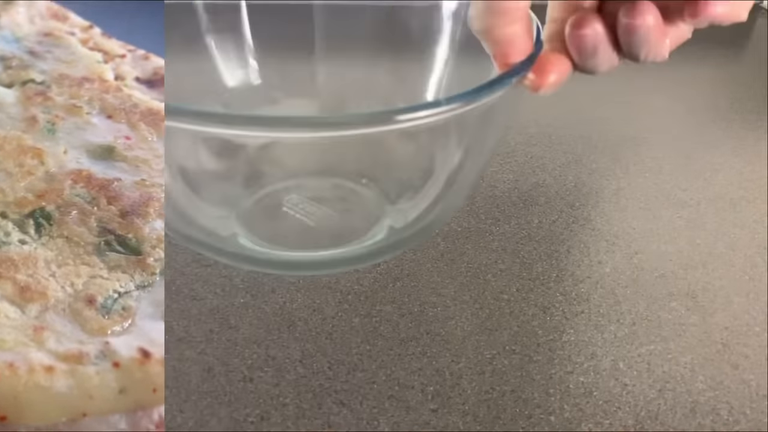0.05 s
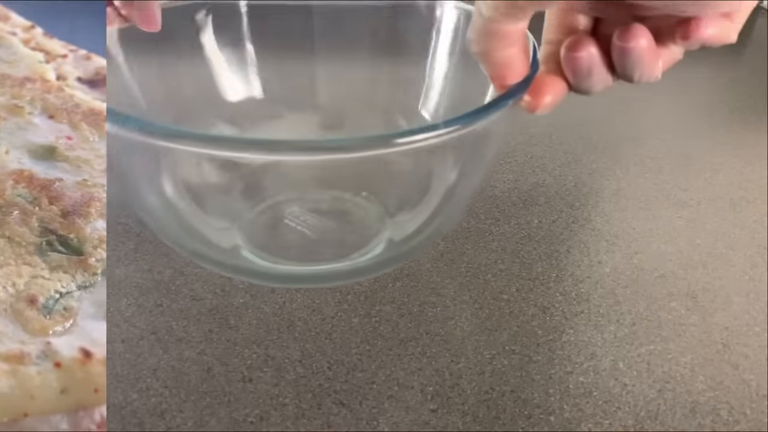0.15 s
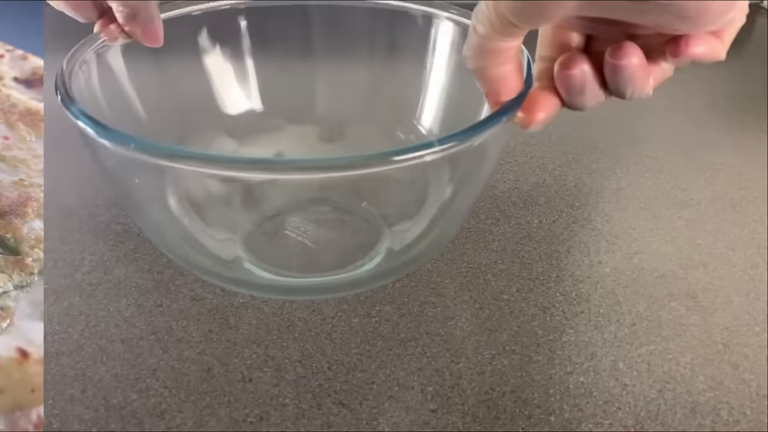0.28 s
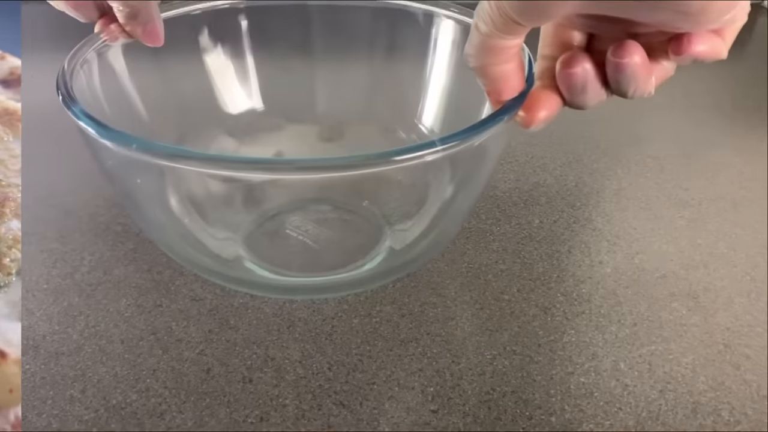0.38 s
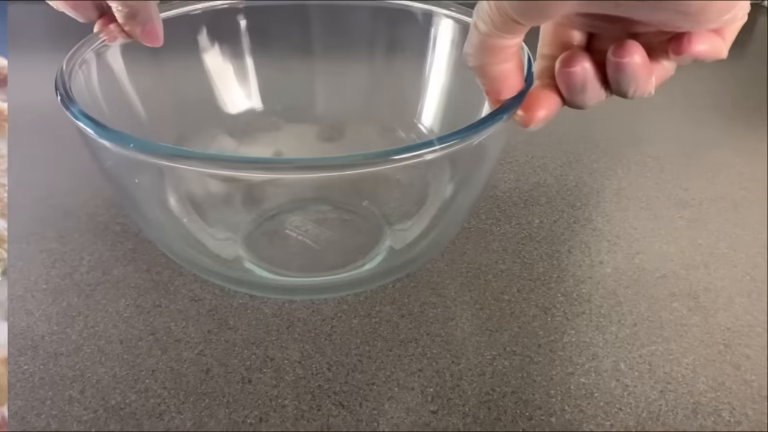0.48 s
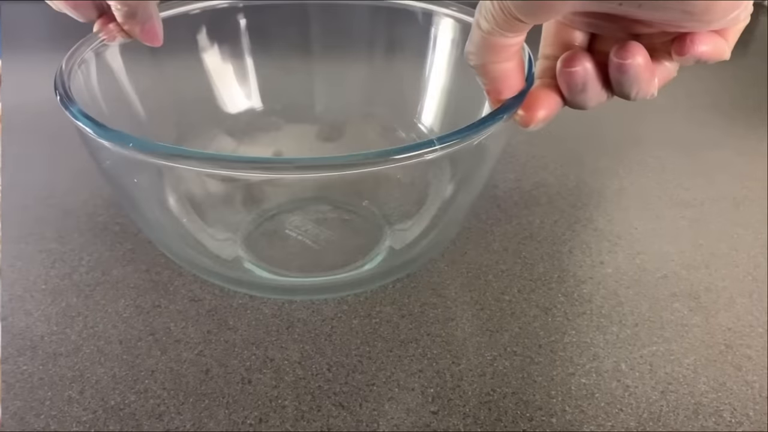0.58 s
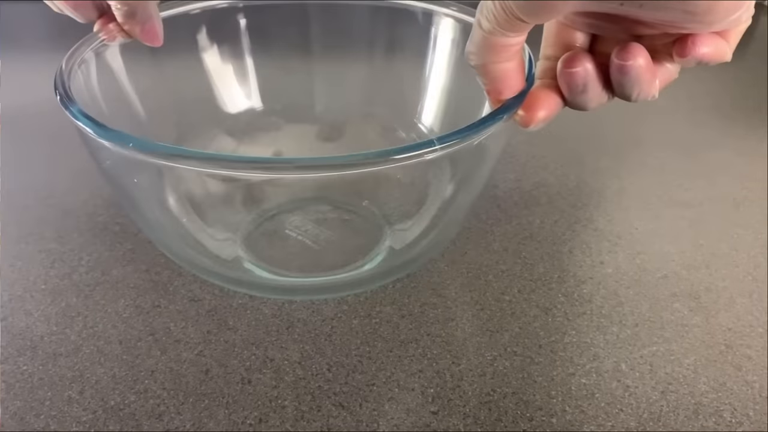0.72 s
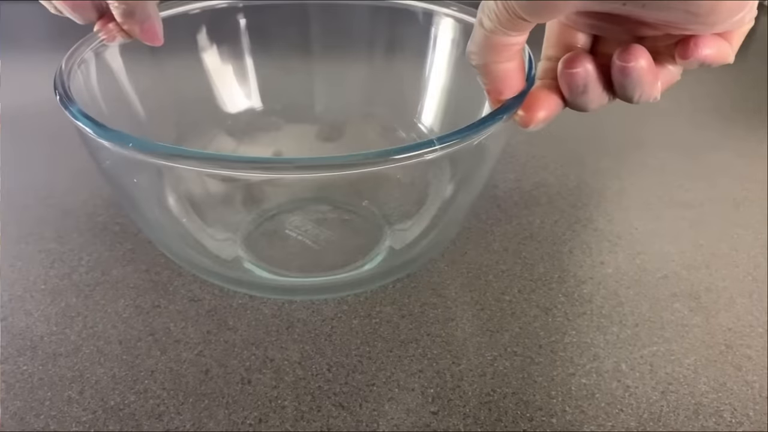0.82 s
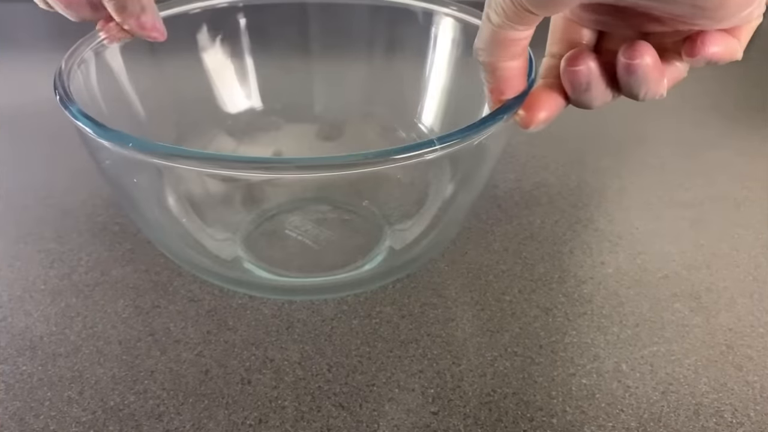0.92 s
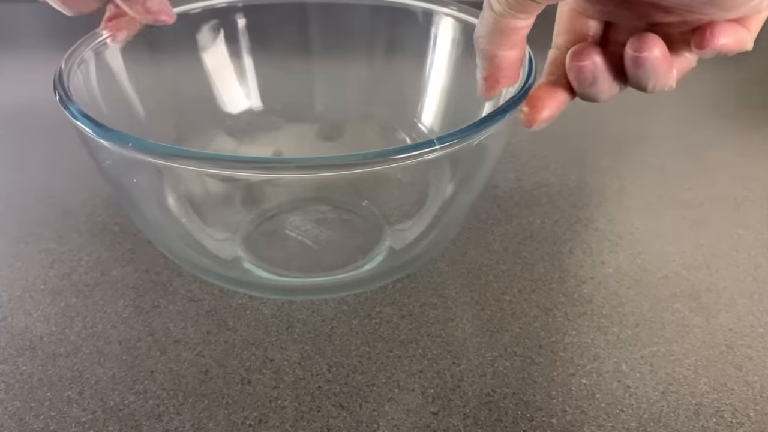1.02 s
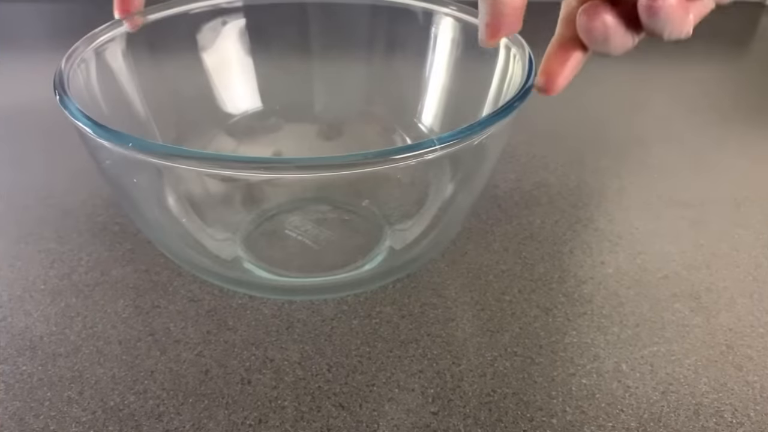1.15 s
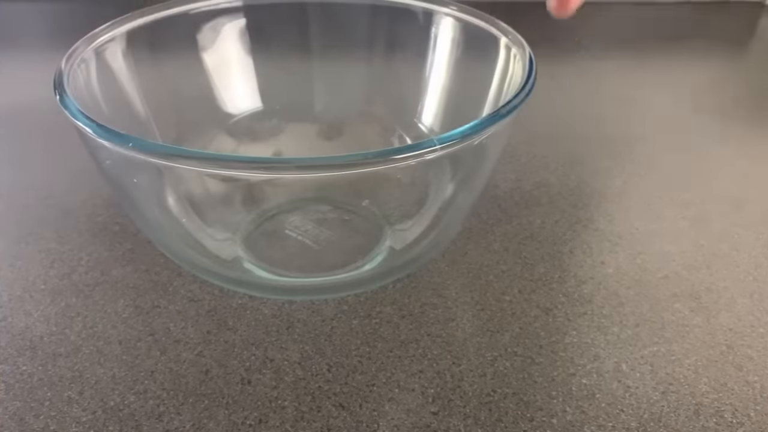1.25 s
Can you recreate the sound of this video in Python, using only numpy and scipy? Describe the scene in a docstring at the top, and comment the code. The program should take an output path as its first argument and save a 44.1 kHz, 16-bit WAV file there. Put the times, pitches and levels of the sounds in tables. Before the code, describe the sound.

Single woody low knock of a hand-held glass bowl landing on a quiet kitchen counter

```python
"""A quiet air hiss and a wavering low hum come first, then the low knock of a hand-held glass bowl
set down on a countertop. Each contact of the base excites dying sines for the dull counter and the faint
glass, plus a noise click; the landing adds treble rattle and a kitchen echo of decaying noise bands.
Wobbling tones make faint ticks of skin on glass. The hiss is shaped noise, the hum a drifting sine."""
import sys
import numpy as np
from scipy import signal
from scipy.fft import rfft, irfft
from scipy.io import wavfile
from scipy.ndimage import uniform_filter1d

SR = 44100
rng = np.random.default_rng(int(sys.argv[2]) if len(sys.argv) > 2 else 0)


def int16_out(signal):
    """Quantize to a 16-bit WAV file."""
    q = np.round(np.clip(np.atleast_2d(signal).T, -1, 1) * 32767)
    wavfile.write(sys.argv[1], SR, q.astype(np.int16))


def magnitude_from_level(level_db):
    """Linear magnitude for a level in decibels (20 dB per decade)."""
    exponent = np.asarray(level_db, float) / 20
    return 10 ** exponent


N = 57330  # length of the scene [samples]

# contacts of the base with the counter: (time [s], thump gain [dB], glass ring gain [dB], crack level [dB])
BASE_CONTACTS = [(0.2167, -67, -60, -83), (0.2199, -22.5, -22.5, -40), (0.2332, -34, -27.5, -59.5),
                 (0.2437, -39, -29.5, -58)]
# modes of counter and cabinet: (frequency [Hz], relative level [dB], t60 [s], rise time [s])
COUNTER_MODES = [(89.5, -11, .25, 0.011), (130.9, -7.5, 0.25, 0.011), (160.3, -11.5, 0.41, 0.01),
                 (244.4, -11.5, 0.35, 0.0037), (315, -21, 0.24, 0.0055), (385.5, -7, 0.13, 0.002),
                 (446.4, -17.5, 0.21, 0.012), (524.8, -11, 0.18, 0.0034), (611, -15.5, 0.23, 0.009),
                 (684, -7, 0.1, 0.0014), (764.7, 1.5, 0.095, 0.00067), (810, 0, .08, 0.0019),
                 (921.4, -14.5, 0.24, 0.0022), (968, -17, 0.22, 0.005), (1218, -11.5, 0.098, 0.00033),
                 (1248.6, -10.5, 0.12, 0.002)]
# modes of the glass, damped by the hands: (frequency [Hz], relative level [dB], t60 [s], rise time [s])
GLASS_MODES = [(1967, -30, 0.064, .001), (2180, -34.5, 0.097, 0.0013), (2790, -27.5, 0.051, 0.00058),
               (3355, -23.5, 0.022, 0.00034), (3900, -31.5, 0.049, 0.00029), (4500, -32.5, 0.05, 0.00032),
               (5500, -61, 0.29, .001), (6660, -76, .08, .001), (7800, -53, .35, 0.0027),
               (8400, -46, .04, 0.00059), (8800, -67, .05, 0.00078), (10260, -52, .19, .002),
               (11800, -65, .06, .001)]
# colour of the kitchen echo: (frequency [Hz], relative density [dB per Hz])
ECHO_COLOUR = [(35, -49), (60, -25.5), (148, -6), (324, -12.5), (619, -13), (744, -7), (875, -18),
               (1390, -13), (2650, -30.5), (10600, -60), (15000, -78)]
# decay of the kitchen echo: (frequency [Hz], t60 [s])
KITCHEN_DECAY = [(80, 0.76), (200, 0.48), (600, 0.6), (1500, 0.3), (3000, 0.36), (6000, 0.37),
                 (12000, 0.33)]
# faint ticks of skin on glass: (time [s], level [dB], frequency [Hz], length [s])
SKIN_TICKS = [(0.191, -69, 3730, 0.0044), (0.603, -70, 2123, 0.035), (0.638, -76.5, 2083, 0.018),
              (0.706, -65, 2660, 0.0019), (0.991, -63.5, 3280, 0.0024)]
# colour of the air hiss: (frequency [Hz], relative density [dB per Hz])
AIR_COLOUR = [(12, -29), (20, -10.5), (62, -5), (294, -13), (328, -18), (377, -14.5), (1310, -24.5),
              (2690, -26.5), (6360, -36.5), (11400, -35.5), (15000, -43)]
# course of the background: (time [s], air level before the lift [dB], treble lift [dB], hum level [dB])
BACKGROUND_COURSE = [(0, -74, 3.5, -73), (.14, -73, 1.5, -73), (0.181, -72, 7, -79), (.3, -67.5, -2, -89),
                     (0.429, -68, -2, -59), (.51, -63, -6, -72), (.6, -65, 0, -63.5), (.7, -66.5, 4, -72.5),
                     (.85, -65, 3, -66.5), (.97, -65.5, 2.5, -60.5), (1.1, -65.5, 1, -68.5),
                     (1.28, -66.5, 1.5, -68)]


def evened(x):
    """Scales to rms 1."""
    return x / np.sqrt(np.mean(x ** 2) + 1e-20)


def read(points, hz):
    """Reads a table on a log-frequency axis."""
    f, value = np.transpose(points)
    return np.interp(np.log(hz + 1), np.log(f + 1), value)


def add(mix, s, sound):
    """Mixes a sound in at a time in seconds, trimmed to the end of the mix."""
    part = mix[round(s * SR):][:len(sound)]
    part += sound[:len(part)]


def knock():
    """Every contact rings counter and glass and clicks; the landing also rattles and stirs the room."""
    out = np.zeros(N)
    counter, glass = ring(COUNTER_MODES), ring(GLASS_MODES)
    for s, thump_db, glass_db, crack_db in BASE_CONTACTS:
        add(out, s, magnitude_from_level(thump_db) * counter + magnitude_from_level(glass_db) * glass)
        add(out, s, magnitude_from_level(crack_db) * crack())
    landing_s, landing_db = BASE_CONTACTS[1][:2]
    add(out, landing_s, magnitude_from_level(landing_db) * echo())
    add(out, landing_s, rattle())
    return out


def ring(modes):
    """A struck body as a sum of dying sines, each swelling over its rise time."""
    t = np.arange(SR // 2) / SR
    out = np.zeros(len(t))
    for hz, db, t60, rise_s in modes:
        decay = magnitude_from_level(db - 60 * t / t60)
        swell = (1 - np.exp(-t / rise_s)) ** 2
        out -= decay * swell * np.sin(2 * np.pi * hz * t)
    return out


def crack():
    """The short hard click of glass meeting the surface: band-passed noise under a fast decay."""
    centre_hz, decay_s = 2350, 0.0013
    t = np.arange(400) / SR
    band = signal.butter(2, [centre_hz / 2, centre_hz * 2], "band", fs=SR)  # an octave either side
    puff = signal.lfilter(*band, rng.standard_normal(len(t)))
    return evened(puff) * np.exp(-t / decay_s)


def rattle():
    """Treble noise while the base chatters to rest: it holds briefly, then dies away."""
    level_db, low_cut_hz, hold_s, t60 = -68, 4920, 0.028, 0.08
    t = np.arange(SR // 8) / SR
    fizz = signal.lfilter(*signal.butter(2, low_cut_hz, "high", fs=SR), rng.standard_normal(len(t)))
    return evened(fizz) * magnitude_from_level(level_db - 60 * np.maximum(t - hold_s, 0) / t60)


def echo():
    """Dense kitchen reflections as coloured noise, each band dying at its own speed."""
    gain_db, rise_s = -13.5, 0.0033
    t = np.arange(SR) / SR
    bands = np.geomspace(60, 15000, num=17)  # band centres [Hz]
    fine = np.fft.rfftfreq(SR, 1 / SR)
    noise = rfft(rng.standard_normal(SR)) * magnitude_from_level(read(ECHO_COLOUR, fine))
    noise = noise / np.sqrt(np.mean(irfft(noise) ** 2))
    # overlapping triangular bands on a log-frequency axis
    place = np.interp(np.log(fine + 1), np.log(bands), np.arange(len(bands)))
    tail = np.zeros(SR)
    for k, hz in enumerate(bands):
        band = irfft(noise * np.maximum(1 - abs(place - k), 0))
        tail += band * magnitude_from_level(-60 * t / read(KITCHEN_DECAY, hz))
    return magnitude_from_level(gain_db) * tail * (1 - np.exp(-t / rise_s))


def ticks():
    """Small rough blips of fingers shifting on the glass: tones with a randomly wobbling phase."""
    out = np.zeros(N)
    for s, db, hz, length_s in SKIN_TICKS:
        t = np.arange(0, length_s, 1 / SR)
        wobble = uniform_filter1d(rng.standard_normal(2000), 60)[:len(t)]
        tone = np.sin(2 * np.pi * hz * t + 6 * wobble)
        add(out, s, magnitude_from_level(db) * np.sin(np.pi * t / length_s) * tone)
    return out


def background():
    """Air hiss and a low wavering hum, each following its level over time."""
    s, level_db, lift_db, hum_db = np.transpose(BACKGROUND_COURSE)
    t = np.arange(N) / SR
    return air(s, lift_db) * magnitude_from_level(np.interp(t, s, level_db)) + hum() * magnitude_from_level(np.interp(t, s, hum_db))


def air(s, lift_db):
    """Coloured noise with drifting patches, broad flicker and a moving treble shelf."""
    patch_db, flicker_db = 0.78, 1.2  # rms spread of the level
    treble_hz = 4950  # the shelf reaches half its lift in dB here
    frames, hz = N // 128 + 5, np.fft.rfftfreq(512, 1 / SR)
    patches = uniform_filter1d(rng.standard_normal((frames, 257)).T, 8, 0)  # smooth across frequency
    patches = evened(uniform_filter1d(patches, 14, 1))  # and across time
    flicker = evened(uniform_filter1d(rng.standard_normal((frames, 257)).T, 80, 0))
    shelf = hz ** 2 / (hz ** 2 + treble_hz ** 2)
    lift = np.outer(shelf, np.interp(np.arange(frames) * 128 / SR, s, lift_db))
    white = shaped(patch_db * patches + flicker_db * flicker + lift)[:N]
    colour = magnitude_from_level(read(AIR_COLOUR, np.fft.rfftfreq(N, 1 / SR)))
    return evened(irfft(rfft(white) * colour, N))


def shaped(db):
    """Noise from random short-time spectra with levels db (bins x frames, hop 128)."""
    a, b = rng.standard_normal((db.shape[1], db.shape[0], 2)).T
    return signal.istft((a + 1j * b) * magnitude_from_level(db), nperseg=512, noverlap=384)[1]


def hum():
    """A low sine whose pitch and level drift at random."""
    centre_hz, wander_hz, swell_db, drift_hz = 54, 3, 2.5, 6.8  # wander and swell are rms
    turns = np.cumsum(centre_hz + wander_hz * slow(drift_hz)) / SR + rng.random()
    return evened(np.sin(2 * np.pi * turns) * magnitude_from_level(swell_db * slow(drift_hz)))


def slow(rate):
    """Slow random drift of rms 1, fading out above about rate in Hz."""
    fine = np.fft.rfftfreq(N, 1 / SR)
    lowpass = (fine > 0) / (1 + (fine / rate) ** 2)
    return evened(irfft(rfft(rng.standard_normal(N)) * lowpass, N))


def scene():
    """Knock, ticks and background in one channel."""
    return (knock() + ticks() + background())[None]


def roll_off(x):
    """The treble ends steeply here."""
    return signal.sosfilt(signal.butter(12, 15160, fs=SR, output="sos"), x)


def record(dry):
    """The level drops sharply just before the end."""
    end_s, after_db = 1.2795, -50
    cut = np.where(np.arange(N) < end_s * SR, 1, magnitude_from_level(after_db))
    return roll_off(dry * cut)


dry = scene()
out = record(dry)
int16_out(out)
```